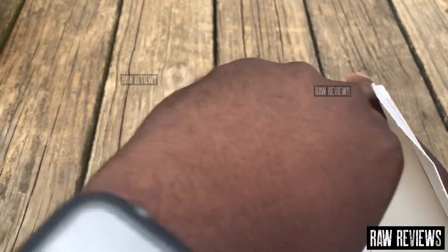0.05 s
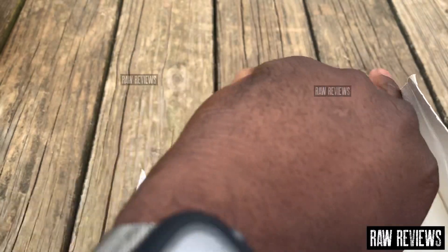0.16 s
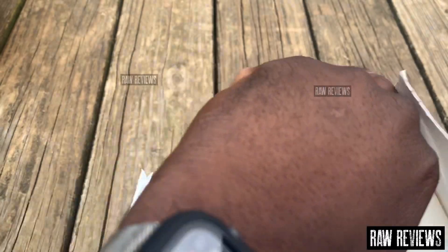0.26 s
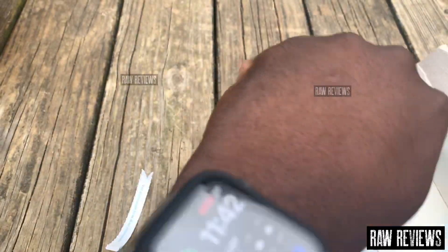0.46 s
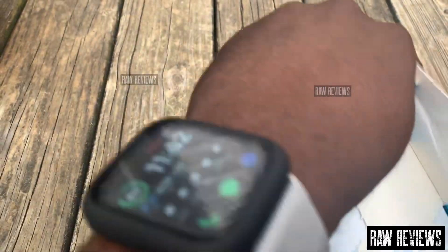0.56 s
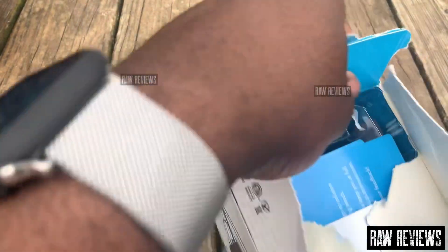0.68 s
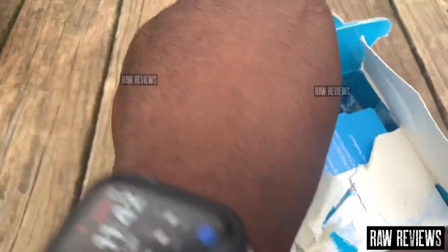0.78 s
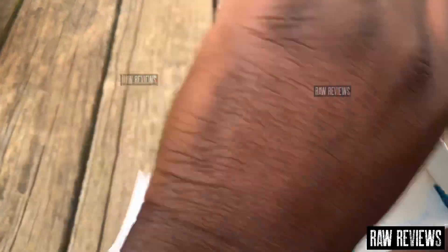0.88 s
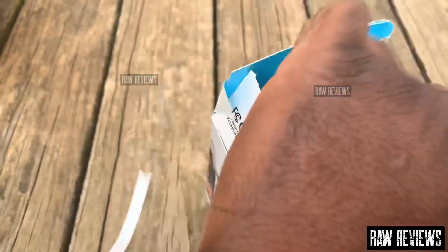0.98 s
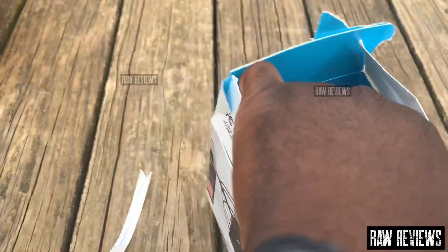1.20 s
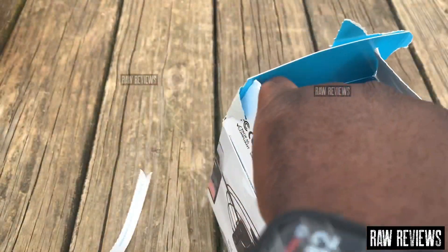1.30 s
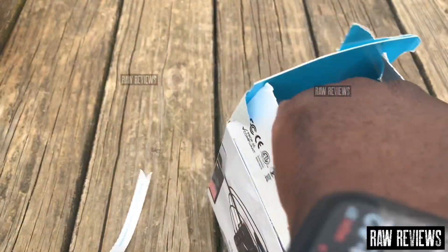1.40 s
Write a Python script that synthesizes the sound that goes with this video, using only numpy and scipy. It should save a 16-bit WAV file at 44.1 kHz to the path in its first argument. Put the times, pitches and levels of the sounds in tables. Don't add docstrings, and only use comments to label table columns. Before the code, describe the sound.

Thin card rips with crisp ticks and three bright cracks, then a crumpled flap rustles and crackles more softly, with a late pop near the end; close, dry outdoor stereo phone pickup, with faint rumble and air.

```python
import sys
import numpy as np
from scipy import signal
from scipy.fft import rfft, irfft, next_fast_len
from scipy.io import wavfile
from scipy.ndimage import uniform_filter1d

SR = 44100
rng = np.random.default_rng(int(sys.argv[2]) if len(sys.argv) > 2 else 0)


def to_wav(sig):
    pcm = np.clip(np.atleast_2d(sig), -1, 1) * 32767
    pcm = np.round(pcm).astype(np.int16)
    wavfile.write(sys.argv[1], SR, pcm.T)


def undo_db(level):
    steps = np.asarray(level, float) / 20
    return 10 ** steps


N = 63945
SIZE = 4096

# (time [s], peak level [dB], panel frequency [Hz], treble level [dB], length [ms])
SNAPS = [
    (0.264, -25, 1000, 2, 3.3),
    (0.371, -14.5, 1640, 0, 5),
    (0.581, -12.5, 1180, -2.5, 4.554),
    (0.995, -29.5, 1050, -5, 8.6),
]
SNAP_DELAYS_MS = [2.43, 1.454, 3.6, 0.88]
# (time [s], peak level [dB],
# panel frequency [Hz], treble level [dB], length [ms])
SEAM_TICKS = [(0.019, -21.5, 1350, -2.5, 2), (0.817, -46, 1050, 0, 2), (0.052, -48, 1070, -14, 6.8),
              (0.077, -26, 1490, -14, 3), (0.115, -28, 1240, -7, 4.2), (0.135, -38.5, 1670, -2.5, 2.9),
              (0.173, -42, 955, -2, 3), (0.192, -24.5, 1490, -22, 5.3), (0.227, -28, 1640, -0.5, 4.3),
              (0.233, -20, 1350, -0.5, 2.9), (0.25, -26, 1560, -5, 3.6), (0.256, -36, 598, 0, 1.2),
              (0.305, -32, 590, -3, 2.5), (0.31, -30, 1200, -1, 2), (0.316, -30, 1790, -1, 3),
              (0.322, -33, 1350, -2, 1.9), (0.4, -25.5, 1910, -3.5, 5.9), (0.429, -28, 1680, -7.5, 8.2),
              (0.472, -34, 1920, 1.5, 1.3), (0.507, -35, 1750, 4, 1.48), (0.593, -16, 740, -29, 1.74)]
# (time [s], peak level [dB], panel frequency [Hz], treble level [dB], length [ms])
FLAP_TICKS = [(0.661, -27, 1580, 0, 5.2), (0.673, -29.5, 930, -1, 5.5), (0.703, -40.5, 596, 3, 5.3),
              (0.778, -33, 600, -8, 2.5), (0.772, -28, 1050, -10, 2.05), (0.833, -37.5, 900, -7.5, 6.2),
              (0.849, -32, 840, -26, 8.2), (0.878, -29, 1870, -20.5, 10.8), (0.923, -35, 848, -36, 5),
              (1.03, -27.5, 1230, -16, 9.3), (1.059, -27.5, 760, -23, 4.4), (1.086, -29, 900, -7, 6.3),
              (1.137, -28, 805, -14, 5.2), (1.172, -39, 690, -3, 7.8), (1.217, -36.5, 939, -7, 4),
              (1.239, -30.5, 840, -3.5, 3.85), (1.278, -21.5, 940, -25, 1.86),
              (1.292, -22.5, 990, -9.5, 3.4), (1.319, -34.5, 830, -1.5, 13.7), (1.344, -37.5, 1030, 2, 2.4),
              (1.384, -32.5, 755, -22, 5.9), (1.438, -31.5, 900, 3, 4.65), (1.448, -23.5, 615, -5, 2.46)]
# (time [s], peak level [dB], panel frequency [Hz], swell [ms])
PANEL_POPS = [(0.2505, -19, 6000, .6), (0.2573, -23.5, 6260, 0.39), (0.2578, -17, 1260, 0.44),
              (.2642, -10.5, 6400, 1), (.5835, -16, 620, 2), (.2662, -21.5, 7010, 1.3),
              (0.2665, -9.5, 1190, 0.51), (.2668, -8, 636, 0.74), (0.264, -18, 12350, 0.65),
              (.3708, -18, 12800, .8), (.3665, -29, 1620, 1.5), (.581, -11, 11520, 0.71),
              (.585, -17, 402, 2.9), (0.122, -34, 325, 3.8), (0.305, -32.5, 205, 8.7),
              (0.2603, -28, 5950, 1.7), (.1822, -26, 6300, 0.89), (0.3709, -6.5, 1707, 1.32),
              (0.3702, -18.5, 5680, 0.69), (.373, -12.5, 945, 1.3), (.374, -15.5, 632, 1.86),
              (0.3736, -23.5, 6800, 0.67), (.376, -24.5, 156, 4.5), (.379, -24.5, 349, 2.7),
              (.563, -23.5, 6100, 0.71), (0.5703, -26, 1810, 0.69), (0.5744, -21, 6560, 1.47),
              (0.5746, -18.5, 1753, 1.5), (.581, -9.5, 6920, 0.68), (.5812, -10.5, 3620, 0.87),
              (.581, -12, 1960, 1.08), (0.583, -16, 2670, 1.2), (0.582, -7, 1080, 1.72),
              (.584, -11, 1380, 1.27), (0.582, -10, 274, 2.27), (.599, -24.5, 227, 3.7),
              (0.728, -35.5, 339, 3.8), (0.9955, -17.5, 1370, 0.99), (0.9993, -21.5, 1010, 0.98),
              (1.0023, -26, 1090, 2), (1.0374, -23.5, 1320, 1.3), (1.0432, -26, 1130, 0.85),
              (1.041, -25.5, 310, 2.3), (1.0862, -25.5, 1764, 1.7), (1.2958, -28.5, 3410, 1),
              (1.312, -31.5, 270, 5.3), (1.4391, -23.5, 1630, 0.71), (1.4482, -8, 5104, 0.55),
              (1.245, -38, 13600, 1)]
# (start [s], end [s], level [dB],
# treble level [dB])
STROKES = [(0, 0.121, -40, -1.5), (0.174, 0.225, -38, -10), (0.235, 0.256, -31.5, 1),
           (0.292, 0.33, -35.5, -1), (0.352, 0.436, -37.5, 0.5), (0.45, 0.508, -44, -3),
           (0.515, 0.566, -41, -6.5), (0.558, 0.563, -37, 5), (0.568, 0.584, -30, 5),
           (0.584, 0.61, -33, -3), (0.61, 0.662, -40, -1.5), (0.655, 0.666, -26.5, -3.5),
           (0.692, 0.724, -54.5, 9), (0.738, 0.793, -39.5, -5), (0.832, 0.838, -42.5, 2),
           (0.892, 0.994, -39.5, -4.5), (0.988, 1.079, -32, -4.5), (1.127, 1.194, -41.5, -5),
           (1.207, 1.253, -39.5, -5), (1.29, 1.325, -37.5, -2), (1.329, 1.361, -52.5, 0),
           (1.373, 1.439, -41, -1), (1.424, 1.46, -49, 10.5)]
# (frequency [Hz], width [Hz], level [dB])
BODY_MODES = [(296, 178, 0), (530, 430, -4.5), (710, 137, 1), (1050, 250, -3), (1350, 148, 0),
              (1780, 310, -2.5)]
# (frequency [Hz], width [Hz], level [dB])
CRISP_MODES = [(3070, 1940, 4.5), (5150, 1750, 7), (7170, 1020, 2), (9020, 1040, 2), (10460, 3230, 0),
               (13000, 4000, -5)]
# (frequency [Hz], phase [rad])
PORT_PHASE = [(0, 0), (860, -0.2), (1890, 0.6), (2760, 1.2), (3360, 6.4), (3790, 7.6), (6370, 12.3),
              (7410, 12.6), (9040, 15.3), (10200, 15.8), (11800, 18.6), (13000, 19.0), (14100, 21.7),
              (15800, 22.2)]
# (time [s], level [dB])
RUMBLE_LEVEL = [(0.0, -36), (0.124, -31.5), (0.156, -51), (0.2, -29), (0.226, -43.5), (0.346, -31.5),
                (0.382, -40), (0.44, -38), (0.468, -47), (0.496, -40), (0.556, -45), (0.584, -38.5),
                (0.888, -46), (0.912, -53), (0.964, -38), (1.154, -41), (1.424, -42), (1.45, -48)]
# (frequency [Hz], level [dB per Hz])
AIR_SPECTRUM = [(18, -23), (30, 0), (200, -12.5), (2080, -29.5), (3410, -29), (3780, -35), (6040, -33),
                (6880, -34), (15000, -37.5)]
# (start [s], end [s])
TREBLE_OPEN = [(.172, .268), (.3, .335), (.345, .378), (.44, .478), (.502, .516), (.771, .783),
               (.814, .821), (1.05, 1.085), (1.235, 1.27), (1.335, 1.385)]

TICK_DELAY_MS = 1.2
PANEL_Q, PANEL_DB, TREBLE_DB = 2.84, 8, 8
RISE_SHARE, TREBLE_SHARE = 0.46, 0.366
BODY_TOP_HZ = 2080
SWELL_RATE = 790
POP_SAG, POP_ROUGH, ROUGH_HZ = 0.008, 0.6, 6000
GRAINS_PER_S, GRAIN_SCATTER_DB, RUSTLE_DB, FLICKER_DB = 1200, 3.5, -4, 1.5
STROKE_ATTACK_S, STROKE_RELEASE_S = 0.0061, 0.012
TAIL_T60_S, TAIL_DB, TAIL_HZ, APART_DB = 0.039, -16.5, 3060, -6
RUMBLE_HZ, RUMBLE_WIDTH_HZ = 59, 38
HUM_HZ, HUM_WIDTH_HZ, HUM_DB, AIR_DB = 107.46, 13.8, -44.5, -46.5
NOTCH_HZ, NOTCH_WIDTH_HZ, NOTCH_DB = 9680, 680, -1
TOP_HZ, TOP_DB, GATE_DB = 14250, -6, -35
SIDES = np.array([[1], [-1]])


def rms1(x):
    return x / np.sqrt(np.mean(x ** 2, axis=-1, keepdims=True))


def peak1(x):
    return x / np.abs(x).max(axis=1, keepdims=True)


def columns(table):
    return [c[:, None] for c in np.array(table, float).T]


def peak(f, hz, width_hz):
    return 1j * f * width_hz / (hz ** 2 - f ** 2 + 1j * f * width_hz)


def bank(f, modes):
    return sum((-1) ** k * undo_db(db) * peak(f, hz, width) for k, (hz, width, db) in enumerate(modes))


def shaped(x, response):
    n = next_fast_len(x.shape[-1] + SIZE)
    f = np.arange(n // 2 + 1) * SR / n
    return irfft(rfft(x, n) * response(f), n)[..., :x.shape[-1]]


def walk(rate):
    k = int(SR / rate)
    held = np.repeat(rng.standard_normal(N)[:N // k + 1], k)
    return 1.2 * uniform_filter1d(uniform_filter1d(held, k), k)[:N]


def placed(starts, events):
    out = np.zeros(N + SIZE)
    np.add.at(out, starts.astype(int) + np.arange(SIZE), events)
    return out[:N]


def breaks(table, delay_ms):
    s, db, hz, treble_db, ms = columns(table)
    t = np.arange(SIZE) / SR
    f = np.arange(SIZE // 2 + 1) * SR / SIZE
    ms, delay_ms = np.clip(ms, 0.3, 30), np.reshape(delay_ms, (-1, 1))
    heights = undo_db(2.66 * rng.exponential(size=(len(table), 1, SIZE)))
    clicks = rng.standard_normal((len(table), 2, SIZE)) * heights

    def fade(length):
        side = np.where(1000 * t < length, RISE_SHARE * length, length)
        return np.exp(-((1000 * t - length) / side) ** 2)

    bend = np.sqrt(f) / np.sqrt(1000) - f / 8000
    late = np.exp(-4j * np.pi * delay_ms * bend * (f < 16000))
    push = rfft(clicks[:, 0] * fade(0.5 * ms))
    soft = 1 / (1 + (f / BODY_TOP_HZ) ** 6)
    panel = undo_db(PANEL_DB) * peak(f, hz, hz / PANEL_Q) + 0.27 * bank(f, BODY_MODES)
    body = peak1(irfft(push * soft * panel * late))
    crackle = rfft(clicks[:, 1] * fade(TREBLE_SHARE * ms))
    highpass = f ** 2 / (f ** 2 + 3200 ** 2)
    crisp = peak1(irfft(crackle * bank(f, CRISP_MODES) * highpass * late))
    hit = body + undo_db(treble_db + TREBLE_DB) * crisp
    return placed(np.maximum((s - 0.00018 * ms) * SR, 0), undo_db(db) * hit)


def pops():
    s, db, hz, ms = columns(PANEL_POPS)
    t = np.arange(SIZE) / SR
    u = SWELL_RATE * t / np.clip(ms, 0.2, 9)
    swell = u * np.exp((1 - u ** 2) / 2)
    tone = np.sin(2 * np.pi * hz * t / (1 + POP_SAG * u))
    flutter = rms1(uniform_filter1d(rng.standard_normal((len(PANEL_POPS), SIZE)), size=7, axis=1))
    rough = 1 + POP_ROUGH * np.minimum(hz / ROUGH_HZ, 1) * flutter
    return placed(s * SR, undo_db(db) * swell * tone * rough)


def grains():
    slips = (rng.random(N) < GRAINS_PER_S / SR) * rng.standard_normal(N)
    heights = undo_db(GRAIN_SCATTER_DB * np.minimum(rng.exponential(size=N), 2))
    return rms1(slips * heights + 0.25 * rng.standard_normal(N))


def rustle():
    start, end, db, treble_db = columns(STROKES)
    t = np.arange(N) / SR
    attack = np.clip((t - start) / STROKE_ATTACK_S, 0, 1)
    release = np.exp(-np.maximum(t - end, 0) / STROKE_RELEASE_S)
    touch = undo_db(db + RUSTLE_DB) * attack * release
    patches = undo_db(3.1 * walk(90.25))
    body = rms1(shaped(grains(), lambda f: bank(f, BODY_MODES) / (1 + (f / BODY_TOP_HZ) ** 4)))
    crisp = rms1(shaped(grains(), lambda f: bank(f, CRISP_MODES)))
    treble_touch = undo_db(FLICKER_DB * walk(250)) * (touch * undo_db(treble_db)).sum(axis=0)
    return patches * (touch.sum(axis=0) * body + treble_touch * crisp)


def scattered(box):
    t = np.arange(SIZE) / SR
    scatter = rng.standard_normal((3, SIZE)) * undo_db(-60 * t / TAIL_T60_S) * (t > 0.001)
    scatter = scatter / np.sqrt(np.sum(scatter ** 2, axis=1, keepdims=True))
    wet = signal.fftconvolve(box[None], scatter, axes=1)[:, :N]
    shared = shaped(wet[0], lambda f: TAIL_HZ / (TAIL_HZ + 1j * f))
    apart = shaped(wet[1:], lambda f: 1j * f / (350 + 1j * f))
    return undo_db(TAIL_DB) * shared + undo_db(APART_DB) * apart


def at_ports(pair):
    hz, lead = np.array(PORT_PHASE).T
    return shaped(pair, lambda f: np.exp(0.5j * np.interp(f, hz, lead) * SIDES))


def narrow_noise(hz, width_hz):
    return rms1(shaped(rng.standard_normal(N), lambda f: peak(f, hz, width_hz) ** 2))


def outdoors():
    hz, db = np.array(AIR_SPECTRUM).T
    noise = rng.standard_normal((2, N))
    wash = shaped(noise, lambda f: undo_db(np.interp(np.log(f + 1), np.log(hz), db)))
    wash = rms1(wash[0]) + SIDES * undo_db(-7) * rms1(wash[1])
    drone = narrow_noise(RUMBLE_HZ, RUMBLE_WIDTH_HZ)
    envelope = uniform_filter1d(np.abs(signal.hilbert(drone)), size=900)
    drone = rms1(drone / (0.46 + envelope))
    rumble = drone + SIDES * undo_db(-14.0) * narrow_noise(RUMBLE_HZ, RUMBLE_WIDTH_HZ)
    times, levels = np.array(RUMBLE_LEVEL).T
    rumble = undo_db(np.interp(np.arange(N) / SR, times, levels)) * rumble
    return rumble + undo_db(HUM_DB) * narrow_noise(HUM_HZ, HUM_WIDTH_HZ) + undo_db(AIR_DB) * wash


def scene():
    box = breaks(SNAPS, SNAP_DELAYS_MS)
    box = box + breaks(SEAM_TICKS, TICK_DELAY_MS) + breaks(FLAP_TICKS, TICK_DELAY_MS)
    box = box + rustle() + pops()
    return at_ports(box + scattered(box)) + outdoors()


def top_cut(x):
    return signal.sosfilt(signal.butter(12, 16290, fs=SR, output="sos"), x)


def record(dry):
    def dip(f):
        return np.exp(-((f - NOTCH_HZ) / NOTCH_WIDTH_HZ) ** 8)

    def top(f):
        return 1 / (1 + np.exp((TOP_HZ - f) / 40))

    treble = shaped(dry.mean(axis=0), lambda f: f > 4000) ** 2
    power = uniform_filter1d(uniform_filter1d(treble, size=400), size=400)
    gate = 1 / (1 + (undo_db(GATE_DB) / np.sqrt(power + 1e-12)) ** 8)
    t = np.arange(N) / SR
    opened = sum(1.0 * (t > start) * (t < end) for start, end in TREBLE_OPEN)
    gate = np.maximum(gate, uniform_filter1d(opened, size=300))
    weak = shaped(dry, lambda f: undo_db(NOTCH_DB) * dip(f) + undo_db(TOP_DB) * top(f) / (1 + (f / 15700) ** 40))
    strong = shaped(dry, lambda f: (1 - dip(f) - top(f)) * f ** 2 / (f ** 2 + 28 ** 2))
    mix = np.clip(strong + gate * weak, -1, 1)
    return top_cut(mix)


dry = scene()
out = record(dry)
to_wav(out)
```